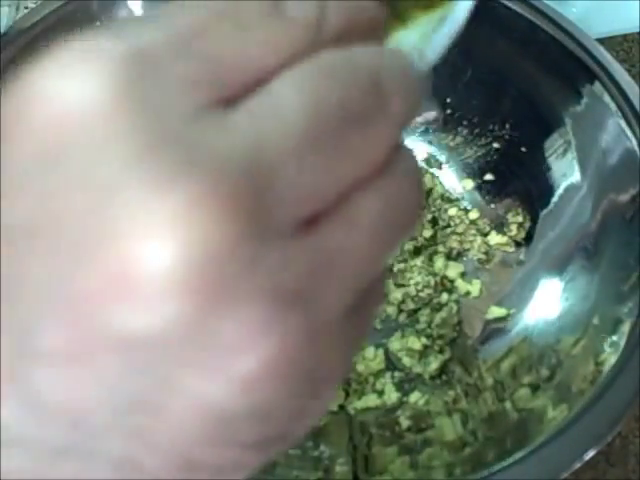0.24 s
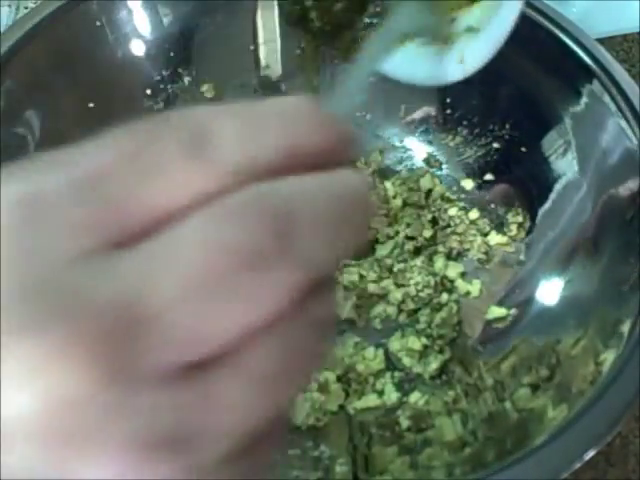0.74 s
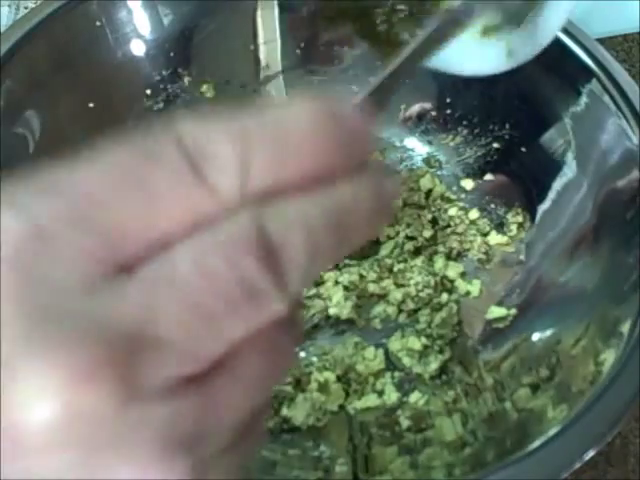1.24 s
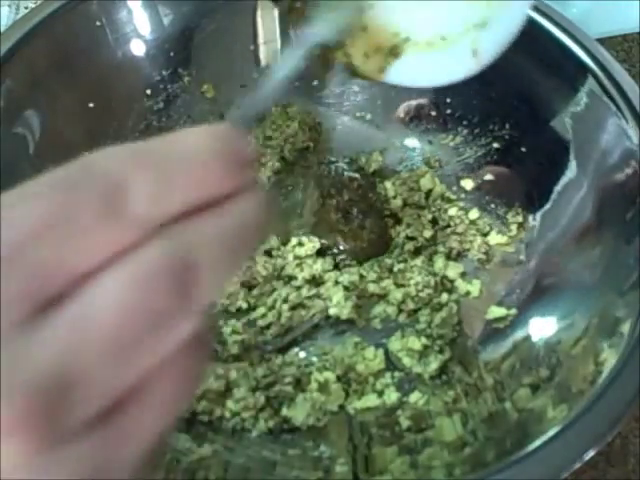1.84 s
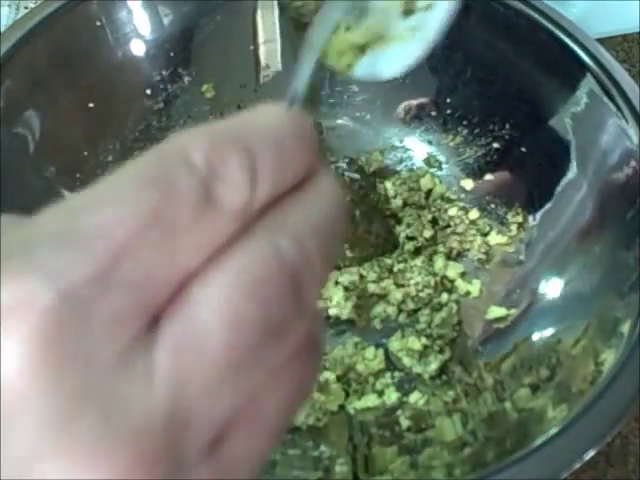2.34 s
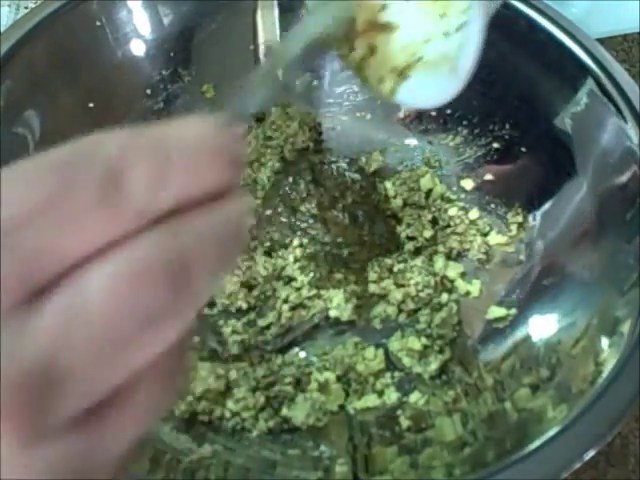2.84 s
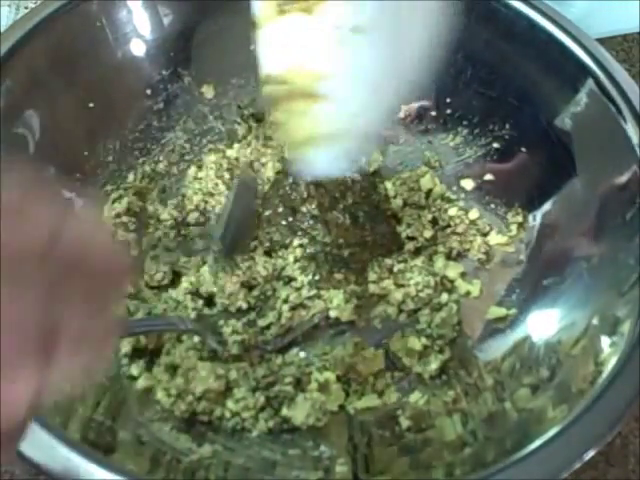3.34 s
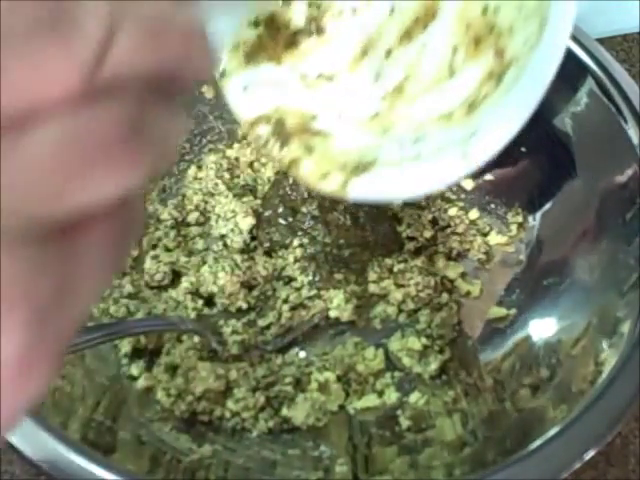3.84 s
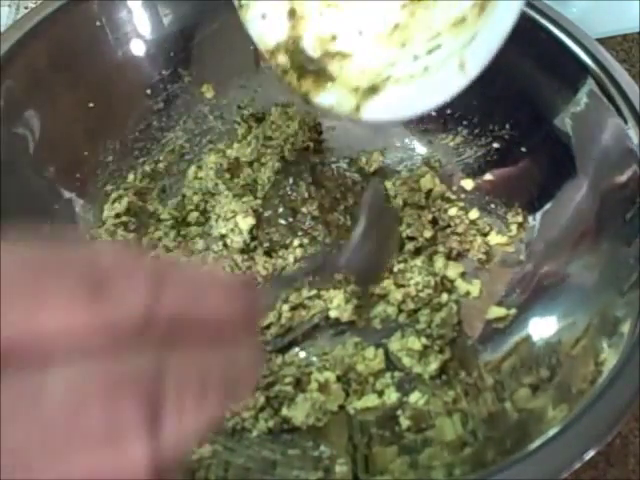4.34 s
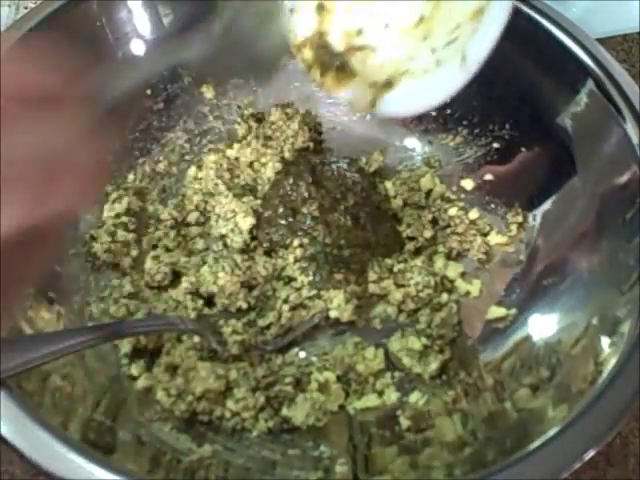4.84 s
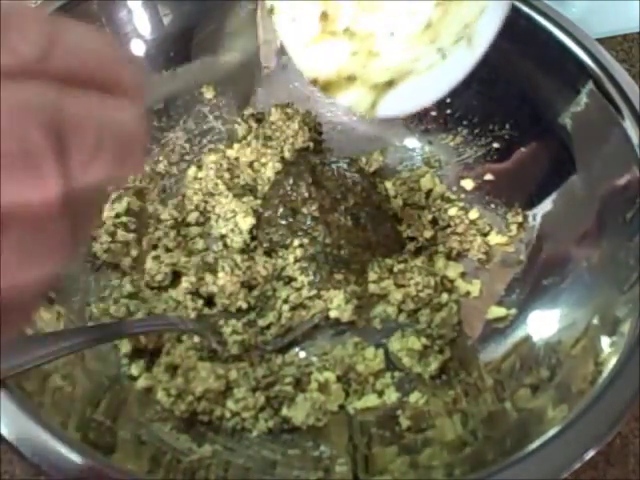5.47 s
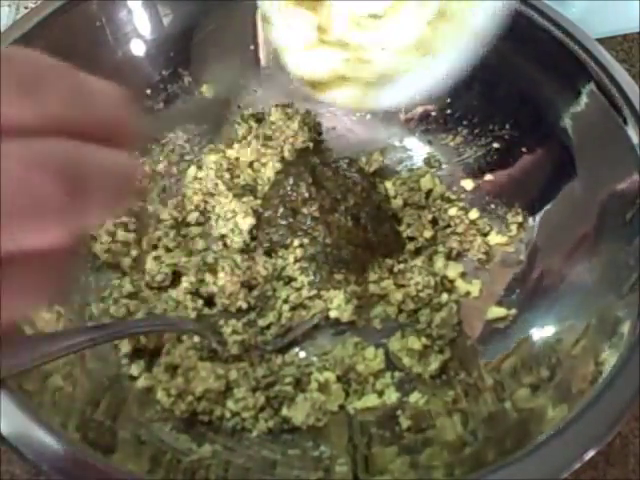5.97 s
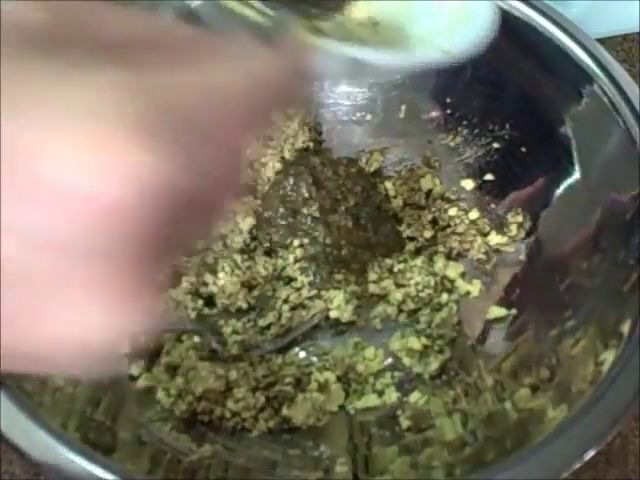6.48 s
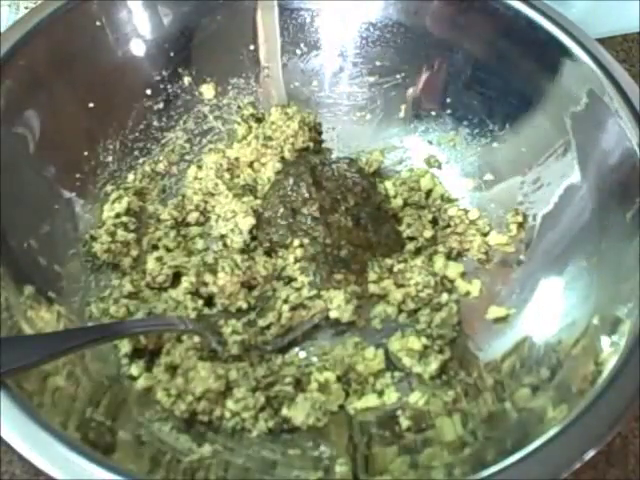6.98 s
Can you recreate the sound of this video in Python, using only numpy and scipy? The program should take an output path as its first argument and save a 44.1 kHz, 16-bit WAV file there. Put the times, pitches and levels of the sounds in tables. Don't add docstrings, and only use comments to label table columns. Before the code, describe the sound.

A quiet kitchen with low refrigerator hum, soft room rumble and faint hiss. For the first 0.7 seconds only small wet rubs and light ticks of a spoon on a glazed dish are heard, very close. At about 0.75 a hard, bright clack starts a run of uneven taps, often with a quick bounce, near 1.05, 1.3, 1.55, 1.85 and 2.25, the last with a wet smear. A short lull follows. From 2.9 the taps ring clearer: one at 2.9, then a cluster with short gritty scrapes at 3.2 to 3.4, a strong hit at 3.85, a weaker one at 4.25, and a group with scratchy drags at 4.5 to 4.7. Very hard, clipped clinks land at 5.05 and 5.4. Smaller ones follow at 5.9, with a brief scrape and rub, then a double at 6.6 and one at 6.9, amid soft hand rustle. Each rings briefly, with a short room tail.

```python
import sys
import numpy as np
from scipy import signal
from scipy.fft import rfft, irfft
from scipy.io import wavfile
from scipy.ndimage import uniform_filter1d

SR = 44100
rng = np.random.default_rng(int(sys.argv[2]) if len(sys.argv) > 2 else 0)


def int16_out(signal):
    q = np.round(np.clip(np.atleast_2d(signal).T, -1, 1) * 32767)
    wavfile.write(sys.argv[1], SR, q.astype(np.int16))


def ratio(d):
    e = np.asarray(d, float) / 20
    return 10 ** e


N = 317961

# f/Hz, spectral level/dB [per Hz]
AIR_SPECTRUM = [(8.8, -32), (15, -0.5), (65, -5), (82, -19.5), (120, 3), (151, -26), (221, -7.5),
                (280, -19.5), (344, -15.5), (474, -25), (517, -26), (2660, -38.5), (3680, -40),
                (15000, -42.5), (16400, -49.5)]
# t/s, level/dB
RUSTLE = [(0, -54.5), (.15, -58), (.8, -61.5), (.96, -55), (1.121, -61), (1.6, -57), (2.7, -59.5),
          (3.55, -60), (3.75, -57.5), (4.099, -60), (4.7, -58.5), (5.62, -62.5), (5.9, -58.5), (6.2, -57.5),
          (6.33, -54), (6.55, -58.5), (6.77, -54), (7.21, -54)]
# f/Hz, width/Hz, level/dB
FRIDGE_HUM = [
    (60, 13, -60.5),
    (119.7, 25, -52.5),
    (221, 38, -64),
    (489, 5.1, -74.5),
]
# f/Hz, T60/s
KITCHEN_T60 = [(300, 0.13), (1000, 0.44), (3000, 0.49), (6000, 0.4), (10000, 0.26), (16000, 0.35)]
# t/s, length/s, peak level/dB, place of
# the peak [0-1], fade after it/dB
RUBS = [(0, 0.14, -52, 0, -28), (.19, .03, -71, 0.7, -15), (.233, 0.042, -48, .05, -24),
        (.46, 0.082, -77, 0.6, -6), (.533, 0.025, -43, 0, -24), (.755, 0.061, -37.5, 0.2, -7.5),
        (2.246, .104, -34.5, 0, -11), (2.547, .033, -56.5, 0.26, -14), (5.855, 0.043, -49.5, 0.3, -19),
        (6.038, 0.021, -33, .06, -30)]
# f/Hz, spectral level/dB [per Hz]
RUB_SPECTRUM = [(240, -54), (400, -21), (897, -14), (3110, -17), (3520, -4), (5260, -17), (7070, -8),
                (8520, -27.5), (13800, -9.5), (16400, -28)]
# t/s, length/s, peak level/dB, place of the peak [0-1], fade after it/dB
DRAGS = [
    (3.232, .024, -41, .1, 7),
    (3.25, .044, -25, .62, -20),
    (3.312, .04, -41, .1, -10),
    (3.372, .058, -33, .45, -22.5),
    (4.53, .066, -34.5, .1, 0),
    (4.61, .08, -41, .1, -1),
    (5.97, .062, -46.5, .9, 10),
]
# f/Hz, width/Hz, level/dB
DRAGGED_DISH = [(1620, 57, -16.5), (2600, 100, 2), (3330, 49, -6), (4450, 82, 2), (6370, 68, 0.5),
                (6910, 120, -5.5), (8800, 85, -4.5), (11800, 250, -8.5), (13600, 81, -14.5),
                (14850, 62, -12.5)]
# f/Hz, spectral level/dB [per Hz]
CRACK_SPECTRUM = [(88, -60), (150, -21.5), (861, -19), (2340, -11.5), (3830, -6.5), (4840, -10.5),
                  (6890, -4.5), (12700, -13), (15100, -6.5), (16400, -23.5)]
# f/Hz, level/dB [dish tipped], level/dB [dish upright], T60/s
TOP = [(15320, -17.5, -13.5, .04), (14170, -11.5, -11, 0.044), (13070, -14.5, -20, 0.11)]
SPOON = [(3558, -0.5, 0, 0.12), (3528, -5, -16, 0.12), (3683, -5.5, -15, 0.051), (7020, -6, -18, 0.066)]
RIM = [(3962, -5.5, 0, 0.1), (3986, -6, -12, 0.068), (3738, -7, -14, 0.071), (3690, -5.5, -15.5, 0.063)]
UPPER = [(6477, 5.5, -1.5, 0.047), (6568, -3.5, -4, 0.066), (6263, -0.5, -7, .05),
         (5660, -11, -12.5, 0.081)]
KNOCK = [(2166, -20.5, -2, 0.067), (1787, -3, -14.5, 0.08), (1450, -3.5, -15.5, 0.055),
         (2870, -9.5, -10.5, 0.071), (2270, -9.5, -6.5, 0.035), (4865, -11, -7.5, 0.058)]
LIP = [(5990, -7.5, -1, 0.13), (5960, -9, -2, 0.027)]
BRIGHT = [(8676, -9, 7.5, 0.061), (7780, -4, -13, .04), (10080, -2, -16.5, 0.029)]
THIN = [(10360, 1.5, -2.5, 0.085), (10650, -10, -3, 0.097), (9845, -6, -13.5, .05)]
GLASSY = [(11570, -5, 4, 0.066), (12205, -4.5, -9, 0.02), (12320, -2.5, -1, 0.035)]
HOLLOW = [(882, -1.5, -1.5, 0.068), (1047, -4.5, 2.5, 0.042), (958, -3, -7, 0.067)]
# level/dB [tipped], level/dB [upright], shares of spoon, rim and edge ring [1]
FOLLOW = [
    (-4.5, -2.5, 0.16, 0.27, 1),
    (-15, -15.3, 1, 0, 0.21),
    (-13.5, -14, 0, 1, 0.72),
    (-13, -10.5, .07, -0.22, 1),
    (-20.5, -15, -0.24, 0.27, -0.23),
    (-13.5, -13, 0.25, .12, 0.92),
    (-21.5, -14.5, -0.25, -0.67, 0.29),
    (-20, -24.5, -0.34, -0.44, -1.1),
    (-14.5, -17, -0.61, -0.54, 0.98),
    (-23, -32, 1, 0.38, -0.49),
]
# t/s, crack level/dB, then spoon, rim and edge ring level/dB [under the crack]
TIPPED_TAPS = [(0.7392, 0.5, -18.5, -24.5, -15.5), (0.804, -2.0, -22, -13.5, -20.5),
               (1.061, -5.5, -10, -29.5, -15), (1.2829, 0, -9, -28.5, -16.5),
               (1.3603, -17.0, -21.5, -22.5, -17.5), (1.5595, 3.5, -14.5, -24.5, -10.5),
               (1.6082, -14, -20, -19, -13), (1.8369, 2.5, -18.5, -20, -19.5),
               (1.9036, -24, -8.5, -13.5, -10.5), (2.2287, 0.5, -15, -17.5, -9)]
# t/s, crack level/dB, then spoon, rim and edge ring level/dB [under the crack]
UPRIGHT_TAPS = [(2.8965, 0.5, -16, -12, -19), (3.2221, -8.5, -22, -13.5, -11.5),
                (3.3008, -14.5, -19, -19, -15), (3.8662, 1, -2.5, -19.5, -20),
                (4.2439, -12.5, -16.5, -12.5, -13.5), (4.5109, 3, -32.5, -11, -13),
                (4.5978, -4, -15, -23.5, -9.5), (4.6928, -7, -17.5, -13.5, -12),
                (5.0534, 3, -19.5, -15.5, -17), (5.4142, 3.5, -23, -7.5, -22),
                (5.4273, -10, -12.5, 0.5, -22), (5.9147, -4, -23, -7, -9.5), (6.5854, -8, -17, -7, -9),
                (6.6012, -9.5, -20.5, -8, -16), (6.9074, -1.5, -14.5, -10.5, -17)]
# t/s, crack level/dB, then ring and hollow knock level/dB [under the crack]
TOUCHES = [(0.08, -53, -25, -30), (.1311, -46, -14.5, 2), (.205, -62, -13, 13), (0.228, -28.5, -16, -9.5),
           (.241, -50.5, -11.5, 9), (.492, -62.5, -11, 11.5), (.5307, -39, -20, -4), (.541, -52.5, -14, 6),
           (0.945, -46.5, -14, -26), (0.9946, -30, -24.5, -3), (2.526, -47, -13.5, -16),
           (2.553, -54.5, -28, -25), (2.7002, -49.5, -17, -10), (3.3244, -59, -10, -20),
           (3.3374, -53, -3, -20), (4.0498, -49.5, -11.5, -25), (4.1394, -66.5, -4.5, -22),
           (5.1644, -24.5, -16, -22), (5.5149, -38.5, -25.5, -2), (6.0366, -23.5, -11.5, -31),
           (6.358, -30, -20, -32)]
# t/s, looseness [ring time over the usual], spoon f/Hz, extra knock level/dB [flat landing]
GRIP = [(.74, 1, 3580, -7.5), (.81, 0.85, 3442, 0), (1.06, 1.1, 3536, -5.5), (1.3, 1.2, 3521, 0),
        (1.56, 0.97, 3517, 3), (1.84, 1.1, 3607, -6), (2.23, 0.98, 3561, -6.5), (2.9, 1.05, 3561, -1),
        (3.22, .8, 3557, 0.5), (3.87, 1.16, 3560, 5), (4.24, 0.81, 3636, -5.5), (4.51, 0.79, 3582, -5),
        (5.05, .95, 3572, -2), (5.42, 0.84, 3628, -0.5), (5.91, 0.68, 3550, -1), (6.59, 0.74, 3570, -4.5),
        (6.91, 1.47, 3536, 5)]

UPRIGHT_S = 2.7
USUAL_RING_DB = (-18, -16.5, -14)
SPOT_DB = 0.94
BITE_DB = -19.5
SLIDE_SHIFT, SLIDE_S = 0.09, 0.009
AIR_DB, HISS_DB = -48, -63
MIC_TOP_HZ = 15850


def evened(x):
    return x / np.sqrt(np.mean(x ** 2) + 1e-20)


def read(points, hz):
    f, value = np.transpose(points)
    return np.interp(np.log(hz + 1), np.log(f + 1), value)


def add(mix, s, sound):
    part = mix[round(s * SR):][:len(sound)]
    part += sound[:len(part)]


def colour(x, points):
    log_gain = np.log(ratio(read(points, abs(np.fft.fftfreq(4096, 1 / SR)))))
    response = np.exp(np.conj(signal.hilbert(log_gain)))
    impulse = np.fft.ifft(response).real[:2048]
    return signal.oaconvolve(x, impulse / np.linalg.norm(impulse))[:len(x)]


def air():
    frames, hz = N // 256 + 5, np.fft.rfftfreq(1024, 1 / SR)
    real, imaginary, patches = rng.standard_normal((frames, len(hz), 3)).T
    patches = uniform_filter1d(patches, 12, 0)
    patches = evened(uniform_filter1d(patches, 14, 1))
    still = (real + 1j * imaginary) * ratio(read(AIR_SPECTRUM, hz)[:, None] + 1.2 * patches)
    swell_db = np.interp(np.arange(frames) * 256 / SR, *np.transpose(RUSTLE)) - HISS_DB
    treble = np.clip(np.log2((hz + 1) / 400) / 2, 0, 1)[:, None]
    scale = ratio(AIR_DB - 4) / np.std(signal.istft(still, nperseg=1024, noverlap=768)[1])
    moving = signal.istft(still * ratio(treble * swell_db), nperseg=1024, noverlap=768)[1]
    return scale * moving[:N]


def fridge():
    f, out = np.fft.rfftfreq(N, 1 / SR), np.zeros(N)
    for hz, width, db in FRIDGE_HUM:
        resonance = 1 / (1 + (2 * (f - hz) / width) ** 2)
        out += ratio(db) * evened(irfft(rfft(rng.standard_normal(N)) * resonance, N))
    return out


def kitchen(x):
    t, out = np.arange(N) / SR, np.zeros(N)
    for k in range(3):
        echoes = np.zeros(SR // 2)
        at = np.arange(250, SR // 2 - 20, 20)
        echoes[at + rng.integers(0, 20, len(at))] = rng.choice([-1., 1.], len(at))
        hz, s, z = signal.stft(echoes, SR, nperseg=256)
        decay = ratio(-60 * s / read(KITCHEN_T60, hz)[:, None])
        tail = signal.istft(z * decay, SR, nperseg=256)[1]
        turn = np.sqrt(2 / 3) * np.cos(2 * np.pi * (t / 1.1 + k / 3))
        out += signal.oaconvolve(x * turn, tail / np.linalg.norm(tail))[:N]
    return out


def slips(strokes, per_s, spread_db):
    pressure = np.zeros(N)
    for start, length, peak_db, place, fade_db in strokes:
        u = np.arange(0, 1, 1 / (length * SR))
        add(pressure, start, ratio(peak_db + np.interp(u, [0, place, 1], [BITE_DB, 0, fade_db])))
    size = ratio(spread_db * np.minimum(rng.exponential(1, N), 4))
    clicks = size * (rng.random(N) < per_s / SR) * rng.choice([-1, 1], N)
    return uniform_filter1d(pressure, size=200) * evened(clicks)


def rubs():
    return colour(slips(RUBS, per_s=9000, spread_db=2.0), RUB_SPECTRUM)


def drags():
    t = np.arange(SR // 20) / SR
    hz, width, db = np.transpose(DRAGGED_DISH)[:, :, None]
    drive = slips(DRAGS, per_s=6000, spread_db=2.5)
    step = (np.arange(N) / (SR * SLIDE_S)).astype(int)
    spot = rng.integers(0, 6, N // 100)[step]
    out = ratio(-8) * colour(drive, CRACK_SPECTRUM)
    for k, shift in enumerate(rng.uniform(-1, 1, (6, len(DRAGGED_DISH), 1))):
        pitch = hz * (1 + SLIDE_SHIFT * shift)
        decay = np.exp(-np.pi * width * t)
        dish = (ratio(db) * np.sqrt(width) * decay * np.sin(2 * np.pi * pitch * t)).sum(0)
        out += signal.oaconvolve(drive * (spot == k), dish / np.linalg.norm(dish))[:N]
    return out


def ring(modes, upright, t, chance):
    hz, tipped_db, upright_db, t60 = np.transpose(modes)[:, :, None]
    wobble = chance[:len(modes)]
    level_db = (upright_db if upright else tipped_db) + SPOT_DB * hz / 4000 * wobble[:, :1]
    pitch = hz * (1 + 0.0023 * wobble[:, 1:])
    choked, free = ratio(-60 * t / (0.49 * t60)), ratio(-15 - 60 * t / (0.96 * t60))
    return (ratio(level_db) * (choked + free) * np.sin(2 * np.pi * pitch * t)).sum(0)


def strike(times, levels_db, groups):
    t, out = np.arange(SR // 3) / SR, np.zeros(N)
    build_up = 1 - np.exp(-t / 0.00054)
    chance = rng.standard_normal((len(times), len(groups), 8, 2))
    at, looseness, spoon_hz, flat_db = np.transpose(GRIP)
    for s, row, luck in zip(times, levels_db, chance):
        loose = np.interp(s, at, looseness)
        tune = np.interp(s, at, spoon_hz) / 3555
        sound = np.zeros(len(t))
        for modes, db, draw in zip(groups, row, luck):
            held = np.array(modes) * [tune if modes is SPOON else 1, 1, 1, loose]
            if modes is KNOCK:
                db = db + np.interp(s, at, flat_db)
            sound += ratio(db) * ring(held, s > UPRIGHT_S, t, draw)
        add(out, s, sound * build_up)
    return out


def taps():
    firm, light = np.concatenate([TIPPED_TAPS, UPRIGHT_TAPS]), np.array(TOUCHES)
    s, crack_db = np.concatenate([firm[:, :2], light[:, :2]]).T
    t, cracks = np.arange(SR // 8) / SR, np.zeros(N)
    rattle, tick = ratio(-60 * t / 0.041), 1.5 * ratio(-60 * t / 0.0014)
    for start, db in zip(s, crack_db):
        add(cracks, start, ratio(db - 8.5) * rng.standard_normal(len(t)) * (rattle + tick))

    follow = np.array(FOLLOW)
    firm_extra_db = firm[:, 2:] - USUAL_RING_DB
    light_extra_db = (light[:, 2:3] - np.mean(USUAL_RING_DB)) * np.ones(3)
    extra_db = np.concatenate([firm_extra_db, light_extra_db])
    usual_db = np.where(s[:, None] > UPRIGHT_S, follow[:, 1], follow[:, 0])
    ring_db = usual_db + extra_db @ follow[:, 2:].T
    ring_db[len(firm):, -1] = light[:, -1]
    groups = TOP, SPOON, RIM, UPPER, KNOCK, LIP, BRIGHT, THIN, GLASSY, HOLLOW
    return colour(cracks, CRACK_SPECTRUM), strike(s, crack_db[:, None] + ring_db, groups)


def scene():
    crack, rings = taps()
    near = rings + drags() + rubs()
    echoes = ratio(-18) * kitchen(near + ratio(-1) * crack)
    return (near + crack + echoes + air() + fridge())[None]


def low_pass(x):
    return signal.sosfilt(signal.butter(12, 16500, fs=SR, output="sos"), x)


def record(dry):
    limited = signal.oaconvolve(dry, signal.firwin(255, MIC_TOP_HZ, fs=SR)[None], "same")
    clipped = np.clip(limited, -0.95, 0.95)
    band = signal.firwin(511, 16250, window=("kaiser", 8), fs=SR)
    stored = np.clip(signal.oaconvolve(clipped, band[None], "same"), -1, 1)
    return low_pass(stored)


dry = scene()
out = record(dry)
int16_out(out)
```